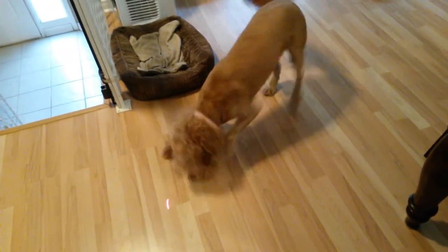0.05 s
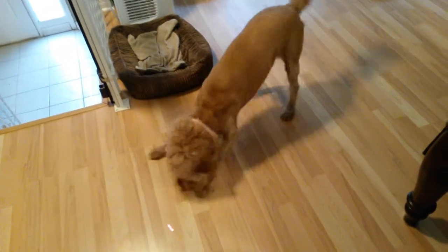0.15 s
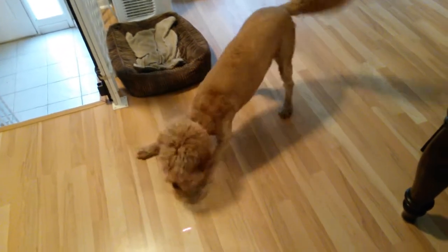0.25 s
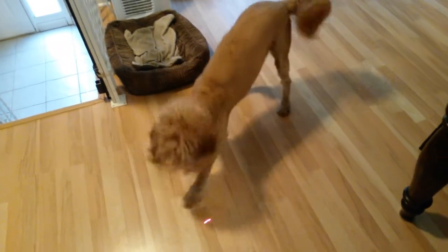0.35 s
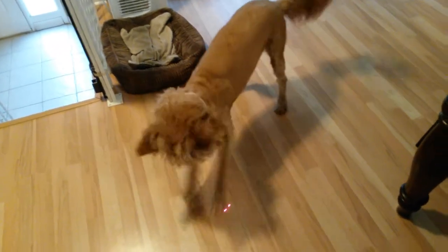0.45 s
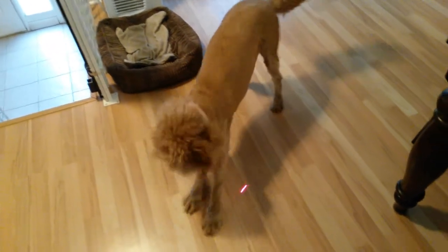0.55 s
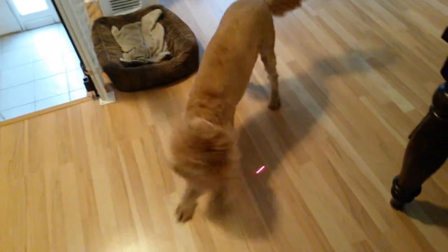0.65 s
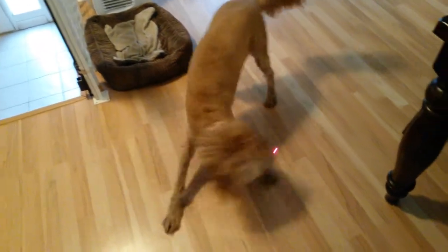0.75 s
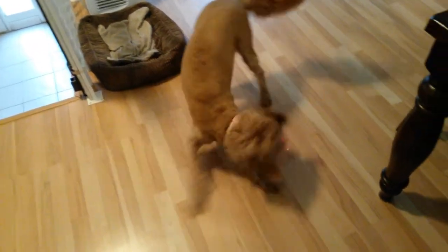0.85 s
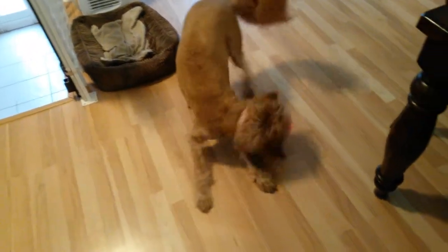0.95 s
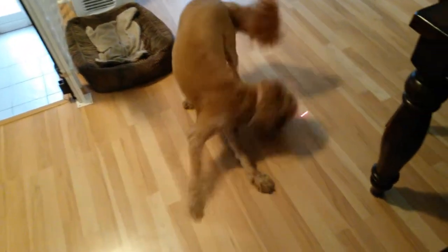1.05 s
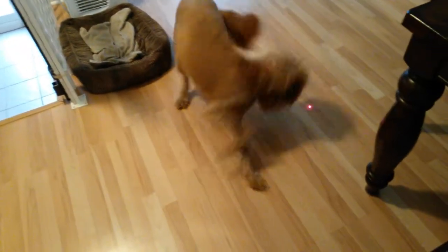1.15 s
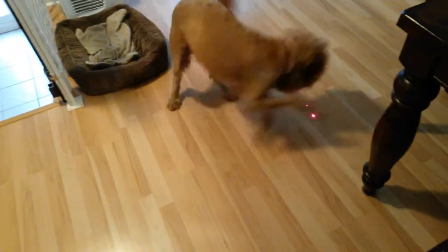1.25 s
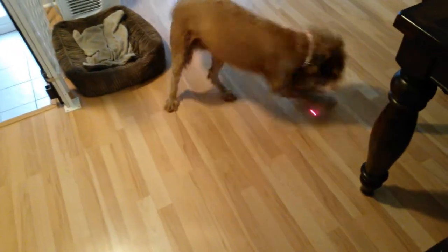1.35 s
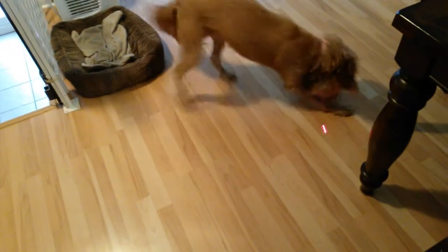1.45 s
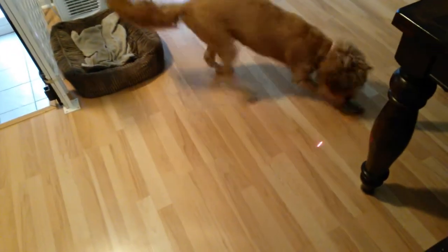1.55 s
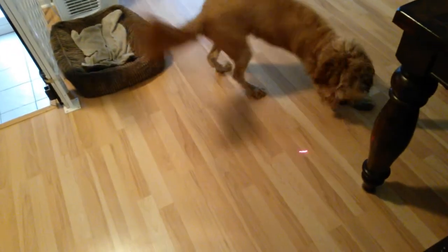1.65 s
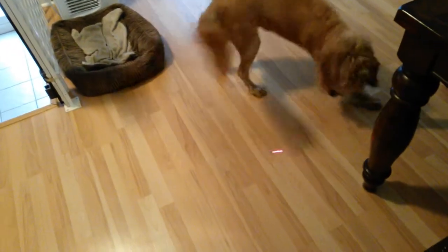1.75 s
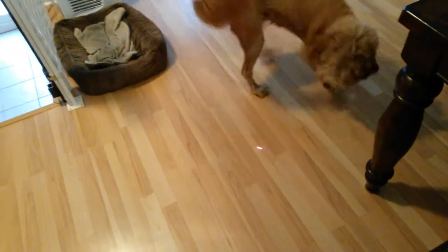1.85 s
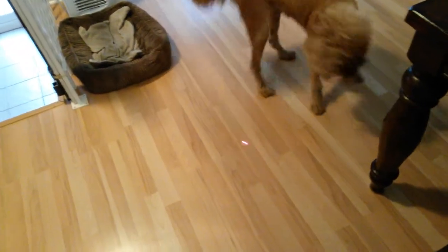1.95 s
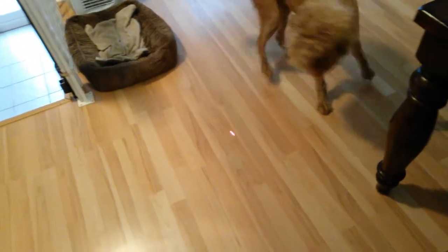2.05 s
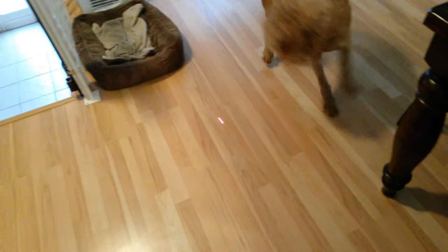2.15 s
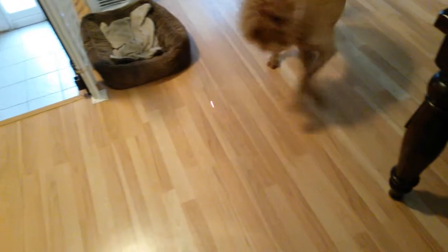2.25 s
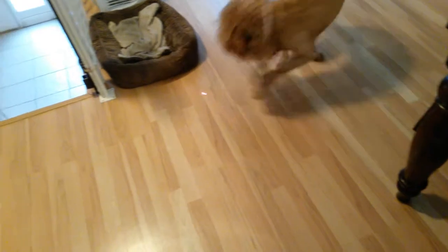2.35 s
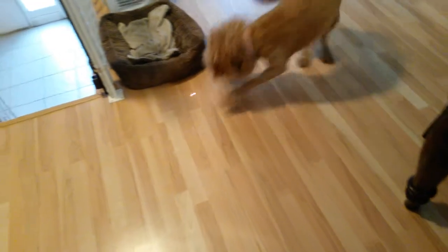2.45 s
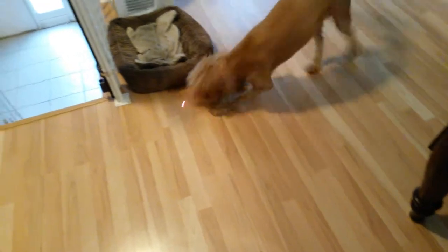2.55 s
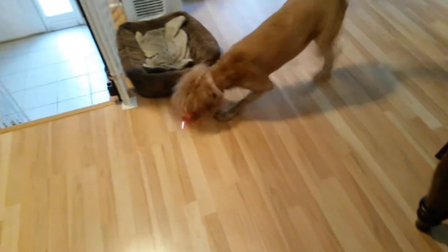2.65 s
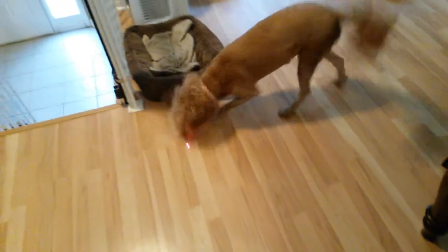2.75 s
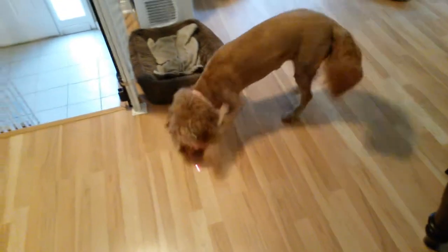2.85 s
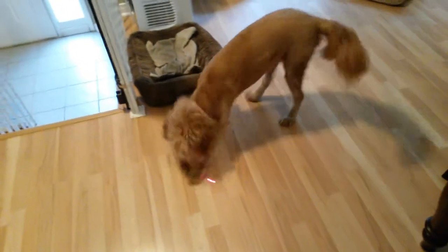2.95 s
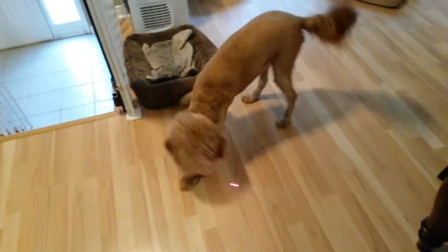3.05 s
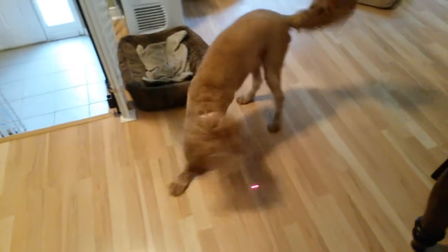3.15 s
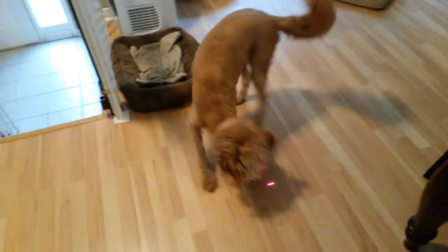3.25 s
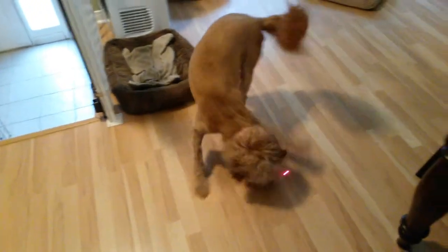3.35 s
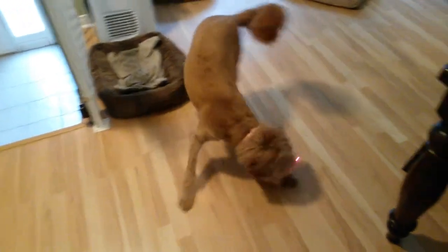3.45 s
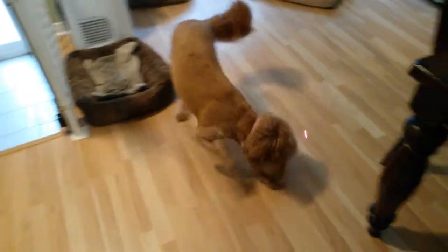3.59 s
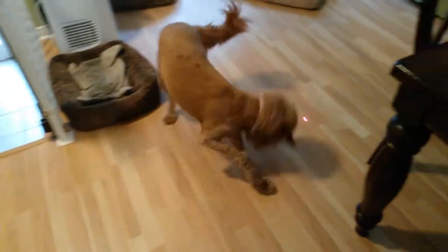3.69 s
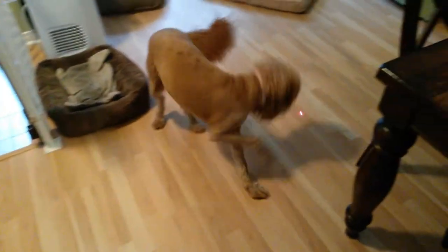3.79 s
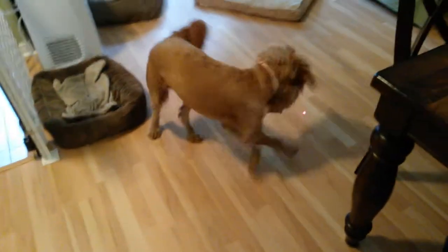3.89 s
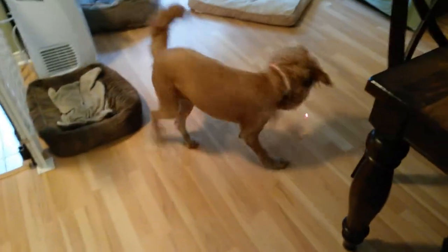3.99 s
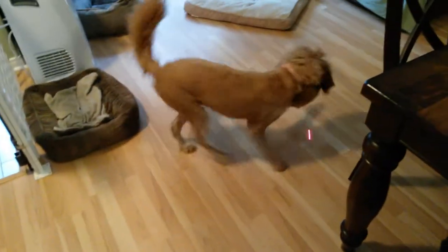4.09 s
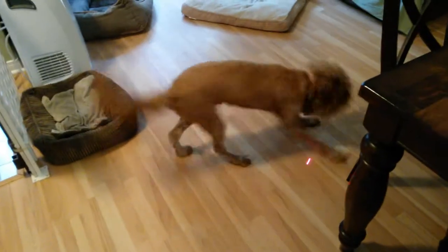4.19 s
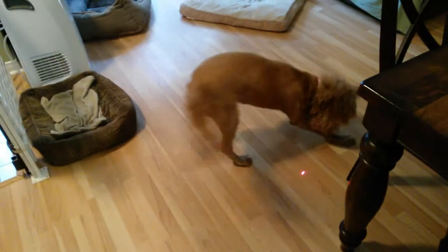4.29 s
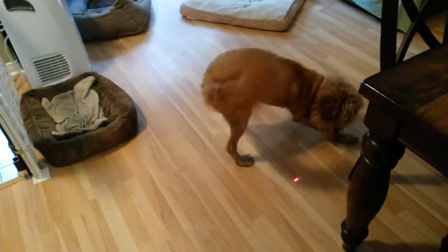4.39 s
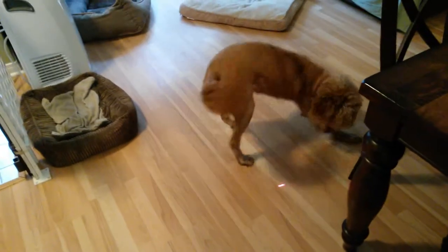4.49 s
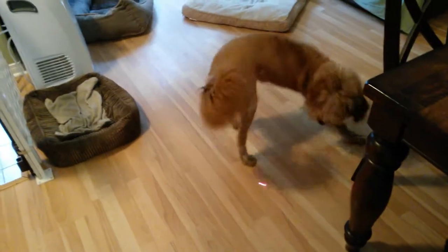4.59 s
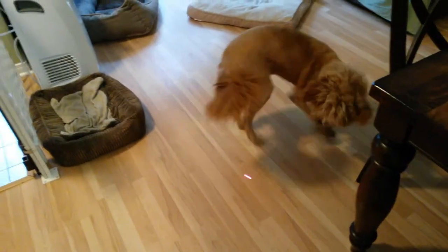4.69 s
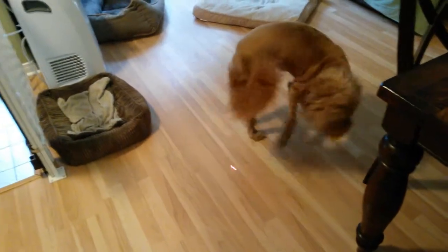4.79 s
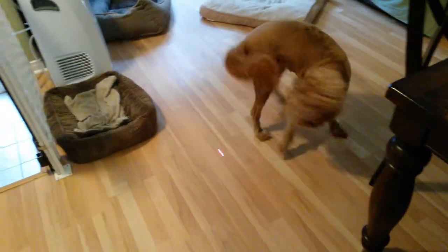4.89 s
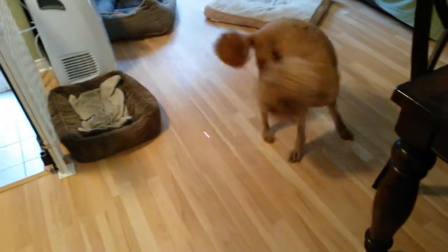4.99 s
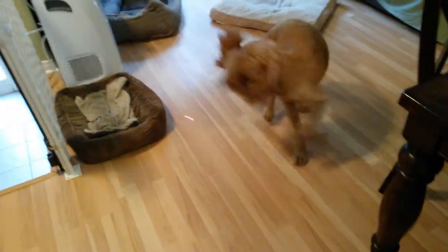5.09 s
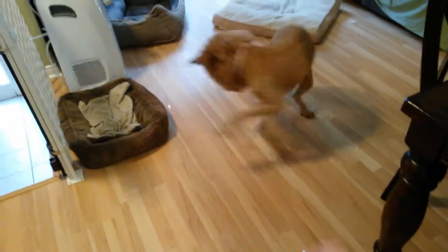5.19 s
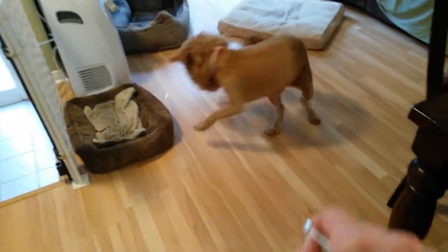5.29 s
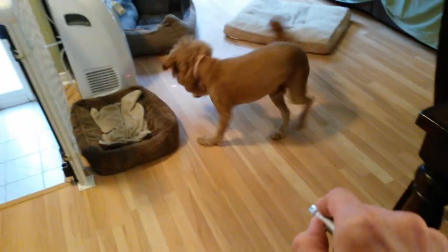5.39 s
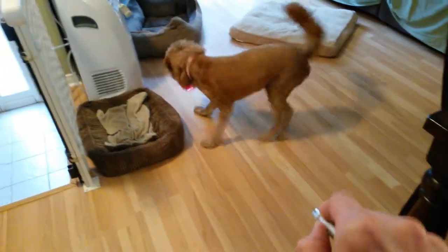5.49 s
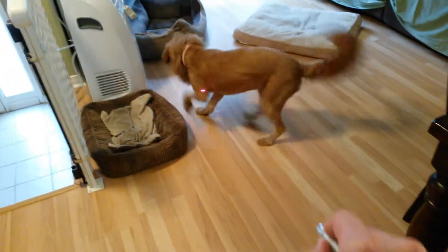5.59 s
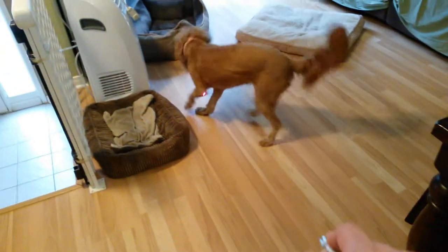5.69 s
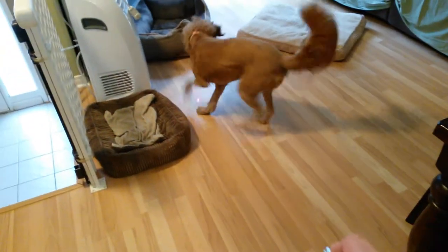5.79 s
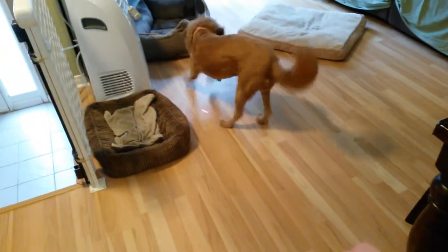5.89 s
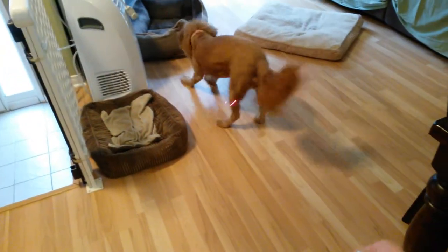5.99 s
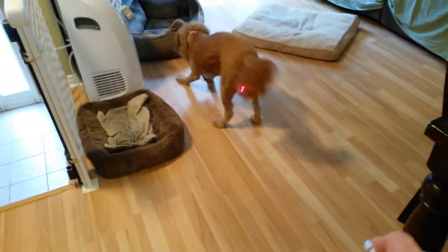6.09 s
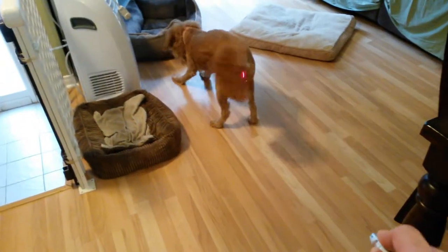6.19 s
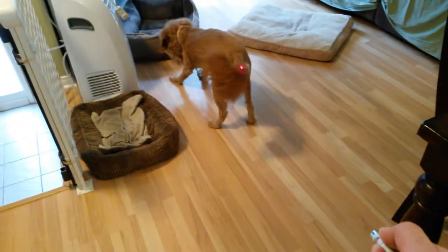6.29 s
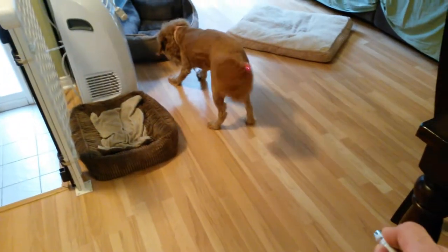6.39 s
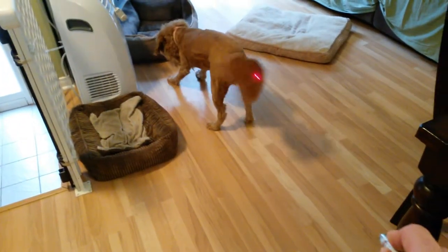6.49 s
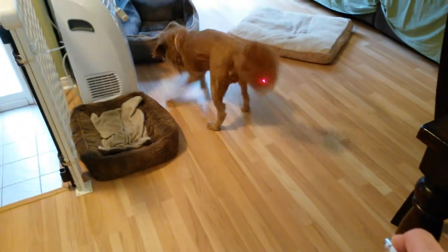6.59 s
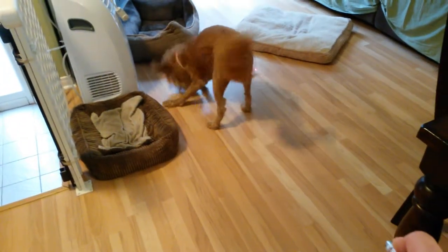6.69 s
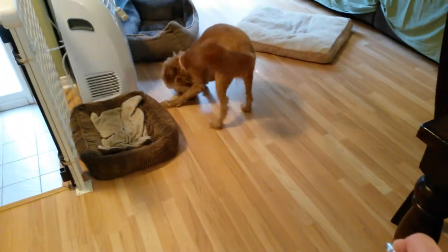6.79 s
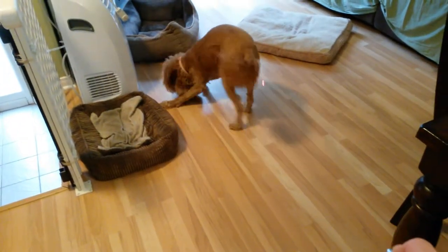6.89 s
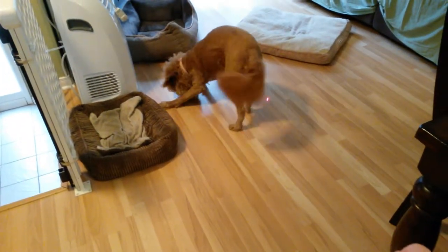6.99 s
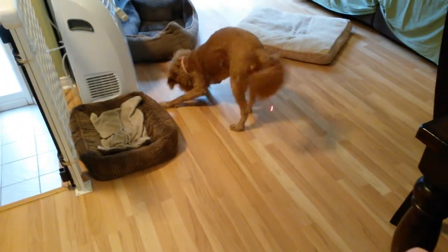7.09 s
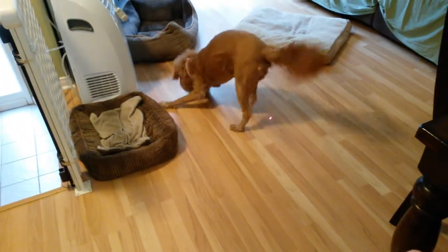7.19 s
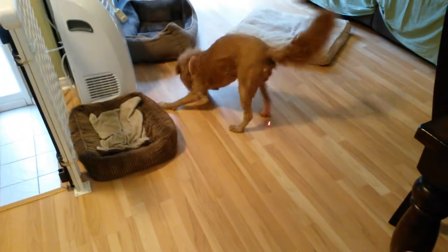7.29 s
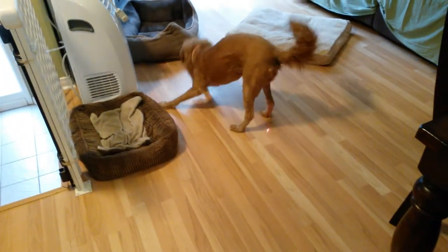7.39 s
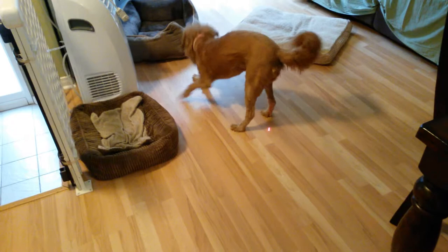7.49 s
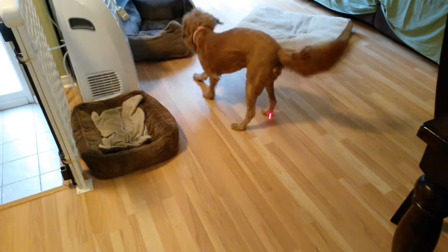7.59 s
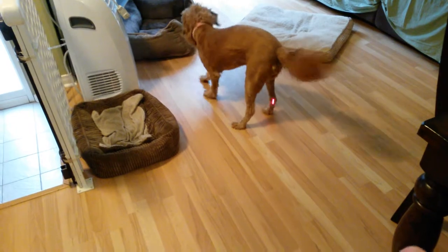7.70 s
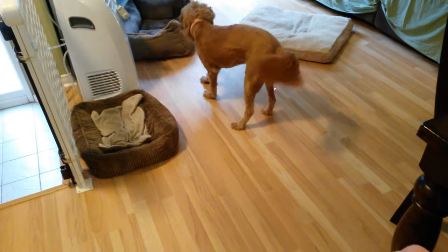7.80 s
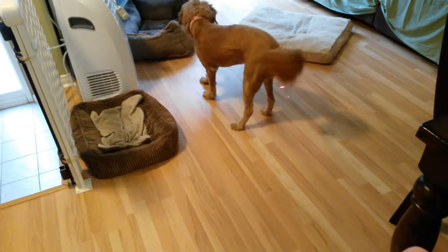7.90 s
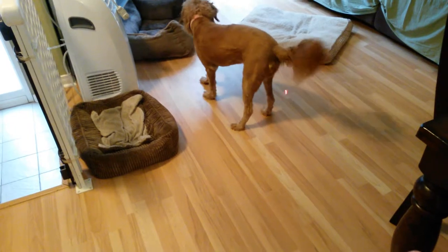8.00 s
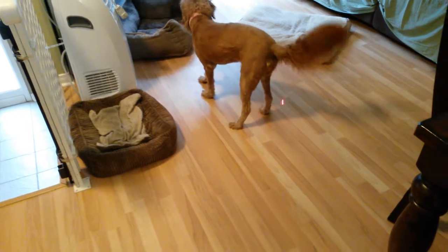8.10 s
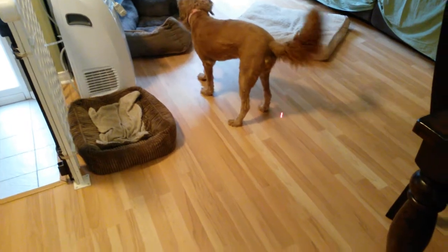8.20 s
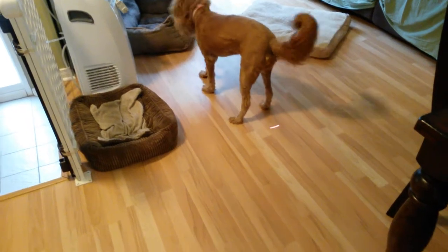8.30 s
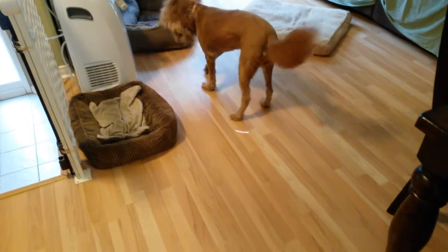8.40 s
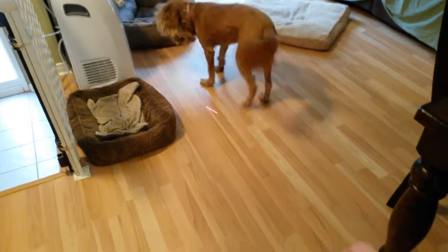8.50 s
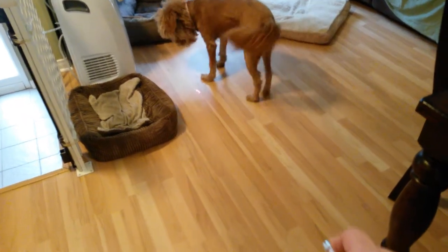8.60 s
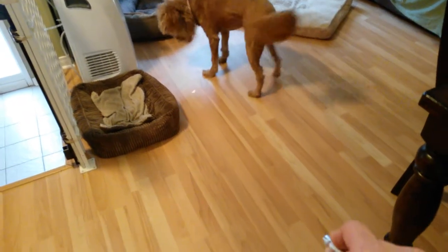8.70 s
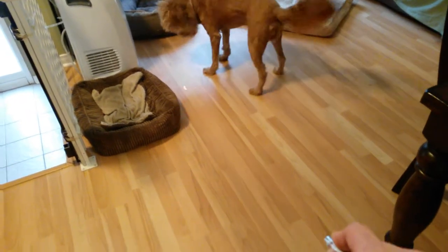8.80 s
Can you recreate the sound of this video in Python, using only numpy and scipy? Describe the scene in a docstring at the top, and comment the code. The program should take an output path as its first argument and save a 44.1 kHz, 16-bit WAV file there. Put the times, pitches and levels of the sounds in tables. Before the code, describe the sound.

A dog's claws click, scrabble and skid on a laminate floor in irregular bursts, with soft paw thumps in a lively bare room.

```python
"""A bare room with a laminate floor: a dog pounces and turns two metres from a phone's two microphones.
Claws tick and skid as shaped noise bursts, paws thump the floating boards, which ring in low modes,
and the walls return a bright tail. Behind lie filtered-noise rumble, a rush that swells and fades,
a low hum and a faint sliding two-note chirp. The phone's gain control ducks just ahead of the
sharpest ticks."""
import sys
import numpy as np
from scipy import signal
from scipy.fft import rfft, irfft
from scipy.io import wavfile
from scipy.ndimage import uniform_filter1d, minimum_filter1d

SR = 44100
rng = np.random.default_rng(int(sys.argv[2]) if len(sys.argv) > 2 else 0)


def store_pcm(level_fs):
    """Save levels as 16-bit WAV."""
    pcm = np.round(np.clip(level_fs, -1, 1) * 32767).astype(np.int16)
    wavfile.write(sys.argv[1], SR, np.atleast_2d(pcm).T)


N = 390240
TIME = np.arange(N) / SR  # s

# Claw ticks. Each row: start in seconds, relative level in dB, nail ring in Hz, left minus right in dB
# ahead of the ports, feed to the room in dB and knock on the planks in dB, both relative to the level.
CLAW_TICKS = [(0.0543, -13, 7000, -6, -18, -21), (.0585, -15, 6650, 2.5, -11, -17),
              (0.0888, -8, 6060, -4.5, -11, -14.5), (0.1245, -7.5, 5150, -1, -12.5, -28),
              (0.1956, -9, 8050, -9.5, -15, -12.5), (.2178, -7.5, 7220, -2, -8, -32),
              (0.2451, -4.5, 6700, -5.5, -11.5, -25), (0.2615, -7, 5940, 11, -11.5, -18),
              (0.2712, -10, 5600, -8, -18, -33), (.31, -13, 8600, -3, -14, -28),
              (0.3332, -19, 5310, -13, -29, -48), (0.6015, -18.5, 6800, -7.5, -14, -16.5),
              (.6495, -14.5, 7300, -2.5, -10, -15), (.826, -14, 7460, 1, -6.5, -14),
              (0.854, -17.5, 5000, -3, -11.5, -30), (1.076, -22.5, 7100, -8.5, -5, -19),
              (1.0842, -27.5, 7170, 3, -18, -14.5), (1.0982, -27, 5570, 1, -4, -26),
              (1.4334, -54, 6630, -3, -14, 6), (1.487, -10, 7700, -6, -10, -16),
              (1.8347, -11, 6670, -7.5, -10, -16), (1.8615, -22, 5460, 1, -3, -45),
              (2.058, -14.5, 6650, -4, -9.5, -21), (2.4983, -43.5, 7500, -18, -15, -23),
              (2.5891, -19.5, 7340, -3, -7, -10.5), (2.602, -19.5, 7000, -5, -14, -30),
              (2.651, -18, 8000, -19, -17, -18), (2.828, -21.5, 6060, -20, 0.7, -12),
              (2.844, -18, 5240, 5, -3, -17), (3.035, -14.5, 6400, -8, -10, -14.5),
              (3.297, -46, 7200, -10, -31, -10), (3.3636, -11.5, 6300, -3, -7, -18),
              (3.551, -23.5, 5540, -6, -3, -18.5), (4.0424, -47, 7160, -4, -7, -8),
              (4.2318, -22, 7000, -11, -4, -18), (4.2741, -13, 6960, -6, -17, -15.5),
              (4.3042, -14, 7240, -9, -2.5, -38), (4.321, -12, 5200, 6, -7.5, -16),
              (4.7457, -16, 7000, -5.5, -10.5, -21.5), (5.0536, -16, 5350, -8, -11.5, -26),
              (5.253, -25.5, 6630, -5, -10.5, -28), (5.456, -38.5, 7110, -2, -8, -26.5),
              (5.4788, -14, 6500, -9.5, -11.5, -18), (5.5784, -19, 8700, -8.5, -14, -41.5),
              (5.6211, -12, 7700, -5.5, -14.5, -28), (5.9568, -29.5, 6800, -4, -18, -23),
              (6.0265, -28.5, 7000, -9, -13, -17.5), (6.0826, -29, 6340, -8, -18.5, -16.5),
              (6.71, -12.5, 7600, -5, -8.5, -26.5), (6.7314, -15.5, 5500, -1, -10.5, -17.5),
              (7, -30, 5500, -10, -10.5, -20.5), (7.015, -27.5, 7000, -17, -9, -32.5),
              (7.0394, -37, 7050, 0, -17, -21), (7.3947, -46.5, 7080, -11, -11, -12),
              (7.681, -10, 6860, -7, -10.5, -24), (8.4963, -37.5, 7100, -14, -11, -13),
              (8.5729, -14.5, 6340, -2, -14, -28), (8.581, -19, 6440, -11, -19, -18.5)]
# Paw thumps. Each row: start in seconds, relative level in dB, pitch in Hz, relative level of the slap in dB.
PAW_THUMPS = [(.076, -15, 203, -33), (.249, -25, 140, -33.5), (.319, -33, 160, -34.5),
              (0.596, -23, 293, -38), (.649, -20.5, 176, -38.5), (.672, -18.5, 192, -36),
              (.832, -29.5, 157, -33.5), (.857, -24.5, 205, -44), (1.083, -35.5, 148, -54),
              (1.492, -22.5, 197, -27), (1.529, -30, 208, -27), (1.866, -40.5, 232, -53),
              (2.591, -30.5, 154, -35.5), (2.622, -40, 144, -28), (2.847, -33, 149, -40.5),
              (3.033, -26.5, 173, -35), (3.367, -28.5, 159, -32.5), (3.531, -34, 177, -52),
              (4.043, -47, 150, -48.5), (4.079, -50.5, 160, -57), (4.269, -31.5, 220, -51),
              (4.31, -25, 252, -27), (4.748, -44.5, 197, -50), (4.802, -45, 147, -51),
              (5.085, -44, 157, -53), (5.245, -50, 168, -48.5), (5.473, -49, 205, -38.5),
              (5.502, -32, 250, -52), (5.576, -36, 347, -35.5), (6.024, -33.5, 171, -40),
              (6.083, -42, 147, -38), (6.728, -31, 297, -63), (7.707, -40, 182, -71),
              (8.622, -50, 278, -66.5)]
# Claws skidding. Each row: start of full contact in seconds, length in seconds, relative level in dB,
# time to gain 20 dB in seconds (2 ms at least).
CLAW_SKIDS = [(0, .016, -19, .011), (0.132, .006, -24, .006), (.192, .16, -31.5, .006),
              (0.598, .006, -24.5, -0.27), (1.193, .12, -37.5, 0.9), (1.512, .15, -21, 0.01),
              (2.532, .012, -29.5, 0.05), (2.632, 0.016, -20, 0), (2.652, .14, -37, 0.16),
              (3.326, .05, -40.5, 0.2), (3.545, .015, -22.5, 0.0159), (4.03, .07, -54, 0.7),
              (4.224, .03, -27, 0.02), (6.02, .012, -36.5, -0.04), (6.086, .11, -49.5, -0.6),
              (6.621, .055, -47.5, -0.15), (7.313, .02, -46, -0.07), (7.52, .012, -47, -0.08),
              (8.45, .05, -49.5, -0.4)]
# Spectrum of a tick heard directly. Each row: frequency in Hz, relative level in dB.
TICK_COLOUR = [(880, -50), (1500, -32), (4470, -12), (5430, -2.5), (6330, -7), (8180, -3), (9950, -10.5),
               (11500, -31.5), (15000, -40), (22000, -120)]
# Spectrum of skids and of the duller tick sent to the room. Each row: frequency in Hz, relative level in dB.
CLAW_COLOUR = [(880, -48.5), (1500, -24), (2000, -21), (3150, -10), (4370, -4), (6300, -1.5),
               (10400, -16.5), (11700, -28), (12400, -54.5), (13500, -53.5), (15000, -76.5)]
# Treble snap of the ticks, bright at first and dull after six seconds.
# Each row: time in seconds, relative level in dB.
SNAP_LEVEL = [(0, -11), (5.7, -19.5), (6, -40), (8.85, -40)]
# Plank resonances under a nail. Each row: frequency in Hz, bandwidth in Hz, relative level in dB.
PLANK_BANDS = [(500, 300, -6), (900, 300, 0), (1700, 280, -4), (2500, 280, -4), (3300, 300, -3)]
# Modes of the floating floor. Each row: frequency in Hz, relative level in dB, time to fall 60 dB in seconds.
BOARD_MODES = [(145, 0, .11), (185, -2, .1), (270, -4, .08), (420, -8, .07), (520, -10, .06),
               (775, -14, .05)]
# Faint chirps. Each row: start in seconds, relative level in dB.
CHIRP_STARTS = [(2.4, -65.5), (7.21, -64), (8.203, -61), (8.738, -52)]
# The two notes of a chirp. Each row: delay in seconds, length in seconds, first and last pitch in Hz,
# relative level in dB.
CHIRP_NOTES = [(0, 0.038, 3730, 3470, 1), (.04, 0.032, 3050, 2920, -1)]
# Decay of the room. Each row: frequency in Hz, time to fall 60 dB in seconds.
ROOM_DECAY = [(100, 0.41), (260, 0.68), (700, 0.49), (1840, 0.49), (4850, 0.55), (12800, 0.33)]
# Rumble of the quiet room. Each row: frequency in Hz, relative level in dB.
RUMBLE_COLOUR = [(18, -64), (30, -24), (43, -3.5), (64, 7), (86, -16), (116, -14.5), (2350, -15.5),
                 (2730, -51), (3790, -11), (4290, -27.5), (12000, -35), (15600, -65), (22000, -120)]
# Spectrum of the rush. Each row: frequency in Hz, relative level in dB.
RUSH_COLOUR = [(59, -49.5), (100, -2), (182, 1.5), (560, -10.5), (671, -5), (3470, -11.5), (4410, -14.5),
               (7570, -13), (12000, -32), (15600, -61), (22000, -120)]
# Swells of the rush. Each row: time in seconds, level in dB before its random wander.
RUSH_LEVEL = [(0, -32), (.39, -47.5), (1.65, -41), (2.29, -56.5), (2.78, -49), (3.5, -48), (3.67, -56),
              (4.14, -55.5), (4.41, -43), (4.53, -53), (4.88, -57), (5.64, -52), (5.77, -62.5), (6.56, -60),
              (6.82, -53), (7.69, -55.5), (7.84, -49), (8.85, -48.5)]
# Swell of the hum. Each row: time in seconds, level in dB ahead of the ports.
HUM_LEVEL = [(1.1, -95), (1.8, -56.5), (2.55, -59.5), (3.2, -89)]
# Likeness of the noise at the two ports. Each row: frequency in Hz, likeness (used between 0 and 1).
PORT_LIKENESS = [(60, 2), (130, 1.26), (290, 0.9), (640, 0.65), (1410, 0.12), (3100, -0.53), (6820, -0.09),
                 (15000, 6)]
# Unequal microphone ports. Each row: frequency in Hz, left minus right in dB.
PORT_DIFFERENCE = [(60, -2.5), (110, 0), (200, 0), (380, 0.5), (700, -0.5), (1290, -4), (2380, -5.5),
                   (4400, 0.5), (8120, -5.5), (15000, -1)]

CONTACT_S = 0.0018  # spread of the nails' landing
SNAP_HZ, SNAP_TILT = 6800, 3.5  # nails that ring higher snap harder: dB per kHz above this ring
PLANK_SCATTER = 0.08  # random spread of plank pitch from tick to tick, as a fraction
SKID_FALL_S = 0.049  # time to lose 20 dB
PUSH_S, SLAP_HZ = 0.019, 437  # decay of a landing's push, centre of the pad's slap
BOOM_DB, BOOM_GROWTH = -27.5, 0.74  # the joists boom at this level plus a share of the thump's dB
FLOOR_LOW_HZ = 125  # the boards are too narrow to radiate below this
RUMBLE_DB = -63.5  # before its random wander
HUM_HZ = 100
TOP_HZ = 15800  # the microphones' steep upper limit


def claws(places=4):
    """Nails tick and drag: direct sound, plus feeds that excite the room from a few places."""
    direct, feed, knock = np.zeros((2, N)), np.zeros((places, N)), np.zeros(N)
    t = TIME[:1200]
    pulse = 1. * (t == 0)
    sharp, dull = colour(pulse, TICK_COLOUR), colour(pulse, CLAW_COLOUR)
    chance = rng.standard_normal((len(CLAW_TICKS), 3, len(t)))
    for k, (row, noise) in enumerate(zip(CLAW_TICKS, chance)):
        s, db, hz, pan_db, room_db, knock_db = row
        # the nails of one paw land within a few milliseconds; each port hears them a little differently
        u = t / CONTACT_S
        hits = (noise[0] + 2.5 * noise[1:]) * np.exp(-u) * np.minimum(5 * u, 1)
        snap_db = np.interp(s, *np.transpose(SNAP_LEVEL)) + SNAP_TILT * (hz - SNAP_HZ) / 1000
        tick = nail_tick(hits, sharp, hz, db, snap_db)
        add(direct, s, tick * undb([[pan_db / 2], [-pan_db / 2]]))
        # all round, the paw sounds duller
        spread = np.convolve(dull, pulse + 0.022 * hits[0])[:len(t)]
        spread = spread + 0.63 * band(spread, hz, 0.4 * hz)
        add(feed[k % places], s, level(spread, db + room_db))
        pitch = 1 + PLANK_SCATTER * np.clip(noise[0, -1], -2, 2)
        add(knock, s, level(plank_knock(hits[0], pitch), db + knock_db))
    skid = skids()
    direct += skid * undb([[-6.0], [-4.0]]) + undb(-10.5) * knock
    feed[0] += undb(-1.5) * skid + undb(-5.5) * knock
    return direct, feed


def nail_tick(hits, sharp, hz, db, snap_db):
    """Nail impacts excite a narrow ring at the nail's own pitch and a treble snap."""
    ringing = hits + 2.14 * band(hits, hz, 0.082 * hz)
    body = signal.fftconvolve(ringing, sharp[None], axes=1)[:, :hits.shape[1]]
    snap = band(hits, 11400, 4000, order=2)
    return peak(body, db + 6.0) + peak(snap, db + snap_db)


def plank_knock(hits, pitch):
    """Nail impacts excite broad plank resonances, which shift together by a small random amount each tick."""
    return sum(undb(db) * band(hits, hz * pitch, width_hz) for hz, width_hz, db in PLANK_BANDS)


def skids():
    """A dragged nail catches on the grain in dense uneven slips."""
    slips = rng.standard_normal(N) * undb(2.0 * rng.exponential(1, N) + 2.2 * walk(110))
    drag = np.zeros(N)
    for s, length, db, rise in CLAW_SKIDS:
        before = (s - TIME) / max(rise, .002)
        after = (TIME - s - length) / SKID_FALL_S
        drag += undb(db - 20 * np.maximum(np.maximum(before, after), 0))
    # a light touch sounds thinner and higher
    light = 1 / (1 + (drag / undb(-44)) ** 2)
    heavy = level(colour(slips, CLAW_COLOUR), -5)
    brush = level(band(heavy, 7800, 3000), -10.0)
    return uniform_filter1d(drag, 200) * (np.sqrt(1 - light) * heavy + np.sqrt(light) * brush)


def paws():
    """Each landing pushes the boards unevenly for a moment; the pad slaps higher, the joists boom lower."""
    push, slap, boom = np.zeros(N), np.zeros(N), np.zeros(N)
    t = TIME[:SR // 8]
    chance = rng.standard_normal((len(PAW_THUMPS), len(t)))
    for (s, db, hz, slap_db), noise in zip(PAW_THUMPS, chance):
        u = t / PUSH_S
        blow = noise * np.minimum(u / 0.13, 1) * np.exp(-u)
        add(push, s, level(band(blow, hz, .62 * hz, order=2), db))
        add(slap, s, level(band(blow, SLAP_HZ, 0.74 * SLAP_HZ, order=2), slap_db))
        add(boom, s, level(band(blow, 57, 26, order=3), BOOM_DB + BOOM_GROWTH * db))
    wood = undb(-58.5) * boards(push + slap) + undb(-13.5) * push
    wood = signal.sosfilt(signal.butter(3, FLOOR_LOW_HZ, "high", fs=SR, output="sos"), wood)
    return wood + undb(-10.0) * slap + undb(-3.5) * boom


def boards(push):
    """The floating floor rings in a few low, decaying modes."""
    t = TIME[:SR // 2]
    ring = sum(undb(db - 60 * t / t60) * np.sin(2 * np.pi * hz * t) for hz, db, t60 in BOARD_MODES)
    return signal.oaconvolve(push, ring)[:N]


def room(x, build_s=0.0072, lumps_db=6.5, lumpy_s=0.029):
    """Wall echoes: uneven at first, then a dense tail whose decay time depends on pitch."""
    t = TIME[:30000]
    noise, tail = rfft(pair(len(t))), 0
    step = 2 * np.log2(np.maximum(np.arange(noise.shape[1]), 1) * SR / len(t))
    for k in range(10, 29):  # overlapping half-octave bands that add up flat, each with its own decay
        part = irfft(noise * np.clip(1 - np.abs(step - k), 0, 1))
        tail = tail + part * undb(-60 * t / along(ROOM_DECAY, 2 ** (k / 2)))
    build = 1 - np.exp(-(t / build_s) ** 2)
    lumps = np.repeat(rng.standard_normal((2, len(t) // 40)), 40, axis=1)
    tail = tail * build * undb(lumps_db * lumps * np.exp(-t / lumpy_s))
    return signal.oaconvolve(x[None], level(tail, -44), axes=1)[:, :N]


def chirps():
    """Two thin wavering notes, each a sine that slides down."""
    out = np.zeros(N)
    for s, db in CHIRP_STARTS:
        for delay, length, first_hz, last_hz, note_db in CHIRP_NOTES:
            count = int(length * SR)
            hz = np.linspace(first_hz, last_hz, count) * (1 + 0.022 * walk(220)[:count])
            note = np.hanning(count) * np.sin(2 * np.pi * np.cumsum(hz) / SR)
            add(out, s + delay, undb(db + note_db) * note)
    return out


def background():
    """Room rumble and a swelling rush of coloured noise, with a low sine hum."""
    rumble = level(np.array([colour(v, RUMBLE_COLOUR) for v in pair(N)]), RUMBLE_DB)
    rumble = rumble * undb(1.0 * walk(3.13))
    rush = level(np.array([colour(v, RUSH_COLOUR) for v in pair(N)]), 0)
    rush = rush * undb(np.interp(TIME, *np.transpose(RUSH_LEVEL)) + 1.2 * walk(8))
    hum = np.sin(2 * np.pi * HUM_HZ * TIME) * undb(np.interp(TIME, *np.transpose(HUM_LEVEL)))
    return rumble + rush + hum


def pair(count):
    """Noise at two ports: the same in the bass, least alike in the middle and low treble, alike at the top."""
    like = np.clip(along(PORT_LIKENESS, np.arange(count // 2 + 1) * SR / count), 0, 1)
    mid, side = rfft(rng.standard_normal((2, count)))
    return irfft(mid * np.sqrt(1 + like) + side * np.sqrt(1 - like) * np.array([[1], [-1]]), count)


def walk(rate):
    """Random levels held 1 / rate s and slewed twice; spread near 1."""
    k = int(SR / rate)
    held = np.repeat(rng.standard_normal(N // k + 1), k)
    return 1.42 * uniform_filter1d(uniform_filter1d(held, k), k)[:N]


def undb(db):
    """Turn dB into an amplitude factor."""
    return 10 ** (np.asarray(db) / 20)


def level(x, db):
    """Set the RMS level."""
    return x * undb(db) / np.sqrt(np.mean(x ** 2))


def peak(x, db):
    """Set the peak level of each channel."""
    return x * undb(db) / np.abs(x).max(axis=-1, keepdims=True)


def along(table, hz):
    """Read (Hz, value) rows on a log-frequency axis."""
    f, v = np.transpose(table)
    return np.interp(np.log(np.maximum(hz, 1)), np.log(f), v)


def colour(x, table, share=1, size=4096):
    """Causal filter with the gain of (Hz, dB) rows, from the folded cepstrum."""
    log_gain = share * along(table, np.arange(size // 2 + 1) * SR / size) * np.log(10) / 20
    c = irfft(log_gain)
    c[1:size // 2] *= 2
    c[size // 2 + 1:] = 0
    return signal.oaconvolve(x, irfft(np.exp(rfft(c))))[:len(x)]


def band(x, hz, width_hz, order=1):
    """Band-pass round a centre."""
    edges = [max(hz - width_hz / 2, 10), min(hz + width_hz / 2, SR / 2.1)]
    return signal.sosfilt(signal.butter(order, edges, "band", fs=SR, output="sos"), x)


def add(track, s, sound):
    """Mix a short sound into a track."""
    i = max(int(s * SR), 0)
    track[..., i:i + sound.shape[-1]] += sound[..., :N - i]


def scene():
    """Sum the direct sounds, their wall echoes and the background at the two microphones."""
    direct, feed = claws()
    thumps, notes = paws(), chirps()
    feed[1] += undb(-7.0) * thumps + undb(9.5) * notes
    return direct + thumps + notes + sum(room(x) for x in feed) + background()


def record(dry, top_db=-4.0, grip=0.68, ahead_s=0.023, hold_s=0.009, release_s=0.011):
    """Unequal ports, a gain control that looks ahead, clipping and a steep treble cut."""
    left = colour(dry[0], PORT_DIFFERENCE, share=.5)
    right = colour(dry[1], PORT_DIFFERENCE, share=-.5)
    x = np.array([left, right])
    # above top_db, the gain gives up a share (grip) of the excess
    loud_db = 20 * np.log10(np.abs(x).max(axis=0) + 1e-9)
    cut = np.clip(grip, 0, 1) * np.minimum(top_db - loud_db, 0)
    span = int((ahead_s + hold_s) * SR)
    cut = uniform_filter1d(minimum_filter1d(cut, 2 * span), span)  # slides down before the peak
    keep = np.exp(-1 / (release_s * SR))
    cut = np.minimum(cut, signal.lfilter([1 - keep], [1, -keep], cut))  # and comes back slowly
    clipped = np.clip(x * undb(cut), -1, 1)
    return signal.sosfilt(signal.ellip(8, .2, 70, TOP_HZ, fs=SR, output="sos"), clipped)


dry = scene()
out = record(dry)
store_pcm(out)
```